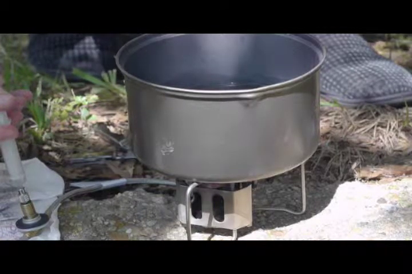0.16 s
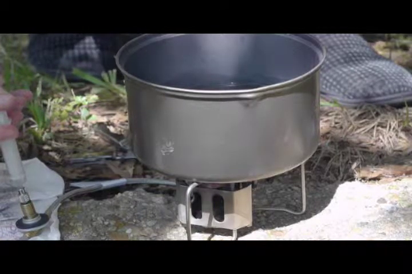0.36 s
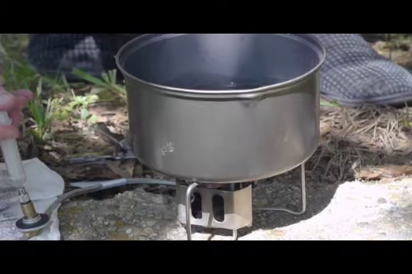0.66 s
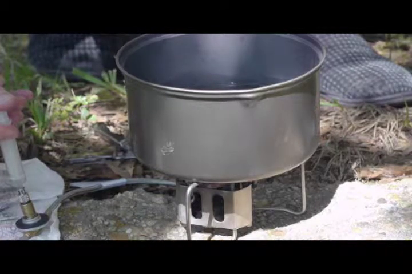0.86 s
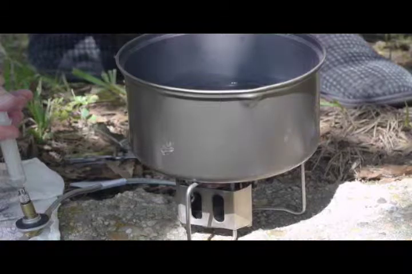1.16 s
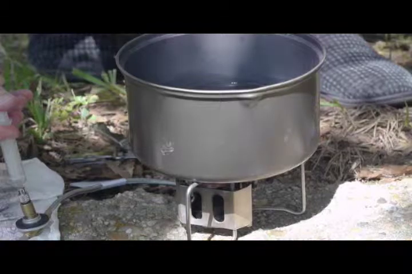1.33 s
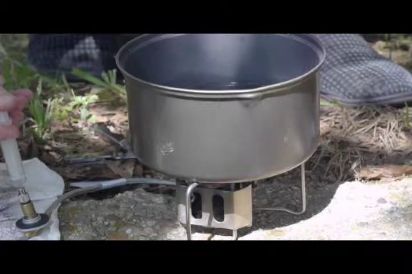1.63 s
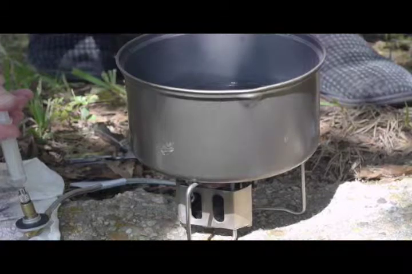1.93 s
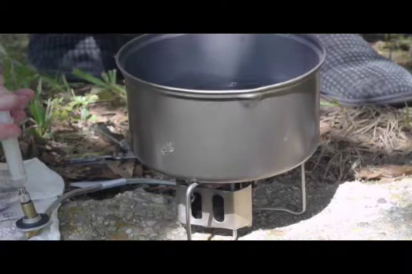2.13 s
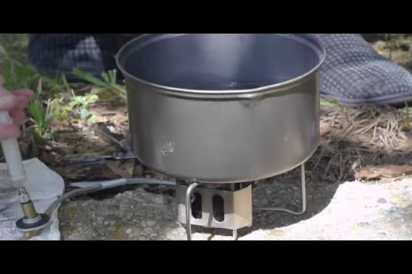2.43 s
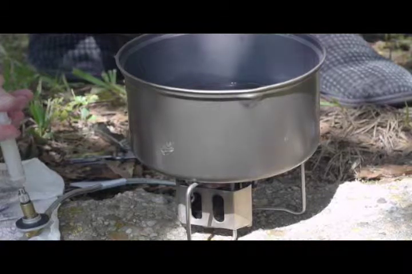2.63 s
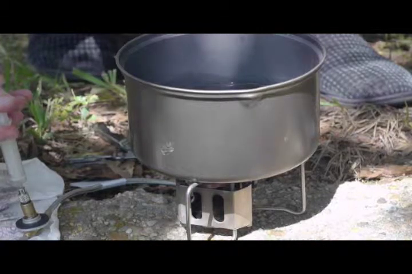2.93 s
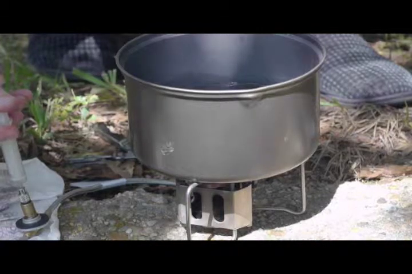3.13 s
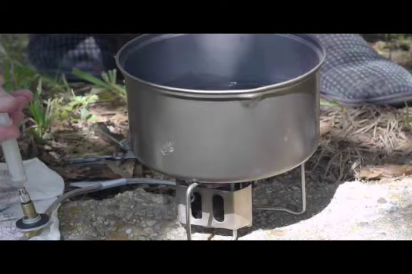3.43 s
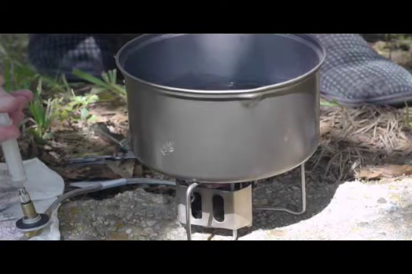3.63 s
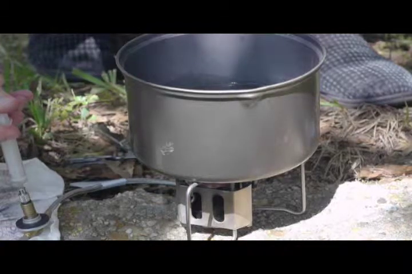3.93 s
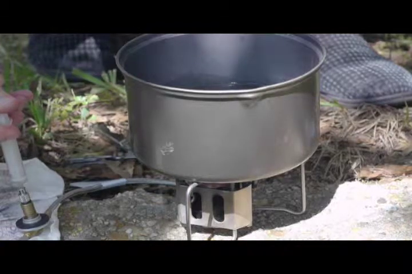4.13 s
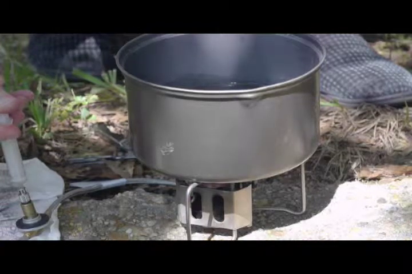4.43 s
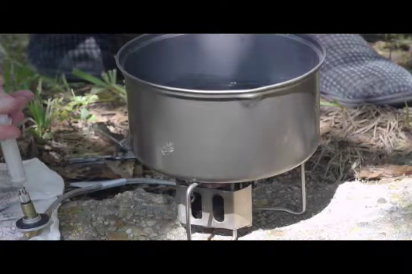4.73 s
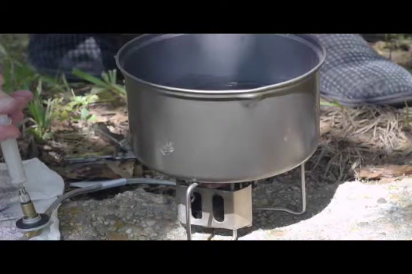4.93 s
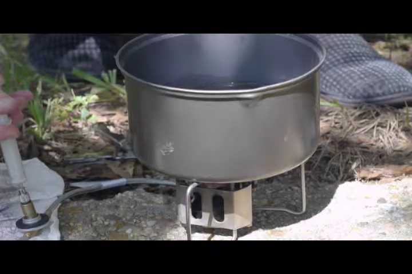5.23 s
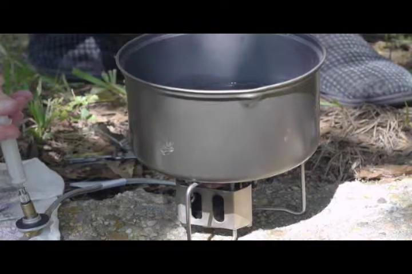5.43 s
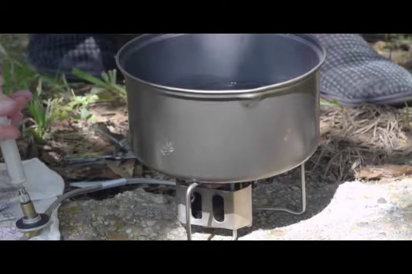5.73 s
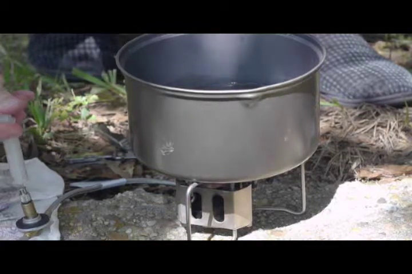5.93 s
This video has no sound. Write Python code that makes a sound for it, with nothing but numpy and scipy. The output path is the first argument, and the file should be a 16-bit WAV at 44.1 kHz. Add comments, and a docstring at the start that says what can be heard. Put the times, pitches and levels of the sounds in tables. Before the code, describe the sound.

Close, rushing gas flame of a camping burner cuts out suddenly as its fuel runs out, with faint traffic and thin bird whistles behind.

```python
"""A small camp stove roars close by under a metal pot, outdoors, until the fuel gives out and it dies.
The roar is turbulent gas, a dense rush with tiny pops, coloured by burner cup, wind shield and pot base.
Behind it far traffic rumbles and engines drone on drifting notes. A small bird whistles now and then,
thin and high, smeared by the trees, and a soft hiss swells once."""
import sys
import numpy as np
from scipy import signal
from scipy.fft import rfft, irfft
from scipy.io import wavfile
from scipy.ndimage import uniform_filter1d

SR = 44100
rng = np.random.default_rng(int(sys.argv[2]) if len(sys.argv) > 2 else 0)


def digitize_waveform(pressure):
    """Quantize a signal to 16-bit integers and store it at the path in sys.argv[1].

    Rows of a 2-D input are taken as channels; values are limited to [-1, 1].
    """
    field = np.atleast_2d(pressure).T
    bounded = np.clip(field, -1, 1)
    quanta = np.round(bounded * 32767).astype(np.int16)
    wavfile.write(sys.argv[1], SR, quanta)


N = 268260


def flame(flicker_db=0.22, flicker_hz=98, scatter_db=-14):
    """The stove's roar in stereo: burning gas, swaying in strength, rings the burner and pot."""
    burn = burning_gas()
    # ground and grass send back a little treble, different on each side
    treble = np.diff(rng.standard_normal((2, N + 2)), n=2)
    scatter = gain_of(scatter_db) * treble * (SR / (2 * np.pi * 4000)) ** 2  # level set at 4 kHz
    strength = gain_of(flame_strength() + flicker_db * wander(flicker_hz))
    bodies = stove_body()
    roar = [signal.oaconvolve(fuel_running_low(burn + back) * strength, body)[:N]
            for back, body in zip(scatter, bodies)]
    return np.array(roar) / np.linalg.norm(bodies[0])


def burning_gas(pops_per_s=1500, pop_share=0.2, spread_db=3.5, flash_s=.003, flash_hz=650):
    """Turbulent burning: a dense rush plus pockets of gas that all pop with the same polarity."""
    # the largest single flashes of gas, dull and short: t/s, level over the rush/dB
    flashes = [(.919, 10), (1.308, 8), (1.346, 13), (1.907, 11), (3.389, 10), (3.434, 7), (4.063, 10)]
    pop_sizes = gain_of(spread_db * np.minimum(rng.exponential(1, N), 4))
    pops = pop_sizes * (rng.random(N) < pops_per_s / SR)
    rush = rng.standard_normal(N)
    burn = np.sqrt(1 - pop_share) * rush - np.sqrt(pop_share) * unit_rms(pops - pops.mean())
    t = np.arange(round(flash_s * SR)) / SR
    puff = np.hanning(len(t)) * np.cos(2 * np.pi * flash_hz * (t - flash_s / 2))
    for start, db in flashes:
        burn[round(start * SR):][:len(puff)] -= gain_of(db) * puff / np.linalg.norm(puff)
    return burn


def flame_strength(burn_db=-23, flutter_db=0.14, flutter_hz=6, starve_s=5.524, fall_db_per_s=500):
    """Level curve in dB: the flame burns steadily, flutters, and dies when the fuel gives out."""
    # brief dips and surges of the roar: t/s, level change/dB, length/s
    swings = [(.09, -2, .06), (.875, -2.5, .036), (1.31, 2, .03), (1.355, 2.5, .036), (1.92, 1, .036),
              (2.225, -3, .05), (2.93, 1.3, .12), (3.72, -2, .036), (4.36, 2, .036), (5.418, 2, .036),
              (5.49, 3.2, .045)]
    t = np.arange(N) / SR
    swing_db = sum(db * np.exp(-(2 * (t - centre) / length) ** 2) for centre, db, length in swings)
    knee_s = .005
    starved_db = fall_db_per_s * knee_s * np.logaddexp(0, (t - starve_s) / knee_s)
    return burn_db + flutter_db * wander(flutter_hz) + swing_db - starved_db


def fuel_running_low(burn):
    """The starving jet brightens, surges once in its body, then loses its top first, its rumble last."""
    # band moves of the dying flame: low f/Hz, high f/Hz, [(t/s, level change/dB)]
    dying_bands = [(30, 380, [(5.52, 0), (5.56, 4)]), (450, 800, [(5.45, 0), (5.485, 2), (5.53, 2.5),
                   (5.55, 0)]), (820, 9000, [(5.46, 0), (5.505, -4)]), (1800, 9000, [(4.8, 0), (5.3, 1.2)])]
    for low_hz, high_hz, change in dying_bands:
        bandpass = signal.butter(3, (low_hz, high_hz), "band", fs=SR, output="sos")
        burn = burn + (gain_of(curves(change)[0]) - 1) * signal.sosfiltfilt(bandpass, burn)
    return burn


def stove_body(left_late_s=5.5e-6, n_fft=8192):
    """Left and right impulse responses of jet and metalwork; the stove sits a little nearer the right."""
    # broad colour of the burning jet: f/Hz, relative level/dB
    jet = [(30, -50.5), (80, -30), (155, -10.5), (200, -7.5), (250, -7.5), (432, -2), (714, -2),
           (2080, -19), (2390, -18.5), (2920, -26), (3720, -28), (4120, -35.5), (6800, -40), (7200, -52),
           (9590, -71.5)]
    # burner cup, wind shield and pot base lift and hollow the roar: f/Hz, width/Hz, gain/dB
    resonances = [(450, 175, 2.32), (714, 120, 1.2), (867, 73, -4.5), (1020, 250, 3), (1187, 130, -4),
                  (1410, 160, 1.5), (1505, 90, -2.5), (2070, 100, 1), (2128, 130, -6), (2360, 170, 5),
                  (2613, 190, 3), (2840, 150, -1), (3280, 180, -1.5), (3520, 250, 3), (3760, 130, 5),
                  (3940, 200, 2), (4330, 94, 5.5), (4570, 80, -4.5), (4670, 170, 4.5), (4760, 100, -3),
                  (5370, 150, -2), (5540, 150, 3)]
    # the pot shades the two sides unequally: f/Hz, width/Hz, left minus right/dB
    pot_shade = [(1120, 220, -.9), (1380, 200, -.5), (1800, 200, -1.3), (2200, 180, -3.5),
                 (2430, 250, -2.6), (2670, 150, 1.5), (2830, 120, -2), (3300, 400, 2), (3780, 150, 1.3),
                 (5250, 200, 1.5), (5620, 120, -1.5), (6350, 500, 3), (7150, 150, 3)]
    hz = np.fft.rfftfreq(n_fft, 1 / SR)
    colour_db = np.maximum(over_frequency(jet, hz), -70) + bell_eq(hz, resonances)
    bodies = []
    for side, late_s in ((.5, left_late_s), (-.5, 0)):
        ring = minimum_phase(colour_db + side * bell_eq(hz, pot_shade))
        delay = np.exp(-2j * np.pi * hz * (late_s + 8 / SR))
        bodies.append(irfft(rfft(ring, n_fft) * delay))
    return bodies


def traffic(patchy_db=1.5, n_fft=2048, hop=512):
    """Far traffic: a noise bed with drifting patches of colour, centred in the bass, wide on top."""
    # colour of the rumble: f/Hz, relative level/dB
    colour = [(15, -40), (30, -24), (60, -6), (100, -5), (135, -3.5), (160, -3), (180, -9), (235, -4),
              (300, -5), (450, -18), (700, -19), (900, -21), (1200, -19), (2000, -28), (3400, -37),
              (5000, -45), (8000, -57)]
    # ebb and swell of the traffic: t/s, level/dB
    swell = [(0, -36.5), (1.4, -40), (2.8, -40), (4.2, -41.5), (5.6, -40), (5.85, -39.5), (6.09, -42.5)]
    # likeness of left and right: f/Hz, correlation/0-1
    likeness = [(60, 1), (460, 0.96), (1200, 0.96), (2500, 0.3), (5000, 0.24)]
    hz = np.fft.rfftfreq(n_fft, 1 / SR)
    left_re, left_im, side_re, side_im, patches = rng.standard_normal((N // hop + 5, len(hz), 5)).T
    patches = uniform_filter1d(patches, size=10, axis=0)  # smooth across frequency
    patches = unit_rms(uniform_filter1d(patches, size=10, axis=1))  # and across time
    shared = over_frequency(likeness, hz)[:, None]
    left = left_re + 1j * left_im
    right = shared * left + np.sqrt(1 - shared ** 2) * (side_re + 1j * side_im)
    spectra = np.array([left, right]) * gain_of(over_frequency(colour, hz)[:, None] + patchy_db * patches)
    rumble = signal.istft(spectra, nperseg=n_fft, noverlap=n_fft - hop)[1][:, :N]
    return gain_of(curves(swell)[0]) * unit_rms(rumble)


def engine_drones(high_ratio=1.585, waver=.008, throb_db=1.5):
    """Far engines hum on two notes that drift together; a third, deeper one passes late."""
    # the paired engine notes: t/s, low note f/Hz, low note level/dB, high note level/dB
    paired_notes = [(0, 78.8, -59, -53), (.55, 79.7, -47.5, -53.5), (1.3, 76.45, -60.5, -47.5),
                    (2.3, 77.6, -51.5, -52), (3.05, 82.3, -45, -43), (3.65, 81.2, -47.5, -44.5),
                    (3.9, 82.1, -64, -49), (4.1, 84.3, -43, -37.5), (4.45, 83.9, -49, -44),
                    (4.6, 83.5, -51, -40.5), (4.85, 82.25, -47, -42), (5.2, 79.4, -52, -45.5),
                    (5.6, 81.2, -54, -44), (5.85, 81.4, -55, -42), (6.09, 81.7, -56, -48)]
    # the deep engine note: t/s, f/Hz, level/dB
    deep_note = [(4.55, 58, -70), (4.75, 59.5, -51), (5.35, 62.5, -50), (5.6, 63, -70)]
    low_hz, low_db, high_db = curves(paired_notes)
    notes = (low_hz, low_db), curves(deep_note), (high_ratio * low_hz, high_db)
    return sum(tone(hz * (1 + waver * wander(7.1)), db + throb_db * wander(5.8)) for hz, db in notes)


def bird(bend=2.3, warble=.016, rough_db=3, pan_db=1.5, echo_db=-2.5, reverb_s=.6):
    """Falling whistles with a fast warble, a little to the left, smeared by the trees."""
    # bird calls: start t/s, length/s, first f/Hz, last f/Hz, level at the crest/dB
    calls = [(-.05, .165, 6900, 6560, -51), (2.39, .21, 7240, 6400, -51), (4.59, .055, 7580, 7480, -54.5),
             (4.715, .165, 7400, 7080, -59.5)]
    song, t = np.zeros(N), np.arange(N) / SR
    for start, length, first_hz, last_hz, crest_db in calls:
        progress = np.clip((t - start) / length, 0, 1)
        hz = first_hz + (last_hz - first_hz) * progress ** bend  # the fall steepens
        db = crest_db + np.interp(progress, (0, .8, 1), (-9, 0, -3))  # swells, then fades
        gate = np.clip(np.minimum(progress, 1 - progress) * length / .03, 0, 1)  # 30 ms ramps
        song += gate * tone(hz * (1 + warble * wander(120)), db + rough_db * wander(60))
    tail_t = np.arange(SR // 4) / SR
    trees = rng.standard_normal((2, len(tail_t))) * gain_of(-60 * tail_t / reverb_s)
    echo = signal.oaconvolve(song[None], trees / np.linalg.norm(trees[0]), axes=1)[:, :N]
    direct = np.array([song * gain_of(pan_db), np.roll(song, 1) / gain_of(pan_db)])  # far side lags
    return direct + gain_of(echo_db) * echo


def swish(start_s=1.04, length_s=.17, band_hz=(3800, 5800), level_db=-51.5):
    """One soft hiss: a band of noise that rises fast and falls slowly."""
    progress = np.clip((np.arange(N) / SR - start_s) / length_s, 0, 1)
    bandpass = signal.butter(2, band_hz, "band", fs=SR, output="sos")
    hiss = unit_rms(signal.sosfilt(bandpass, rng.standard_normal(N)))
    return gain_of(level_db) * hiss * np.sin(np.pi * progress ** .55)


def gain_of(db):
    return 10 ** (np.asarray(db) / 20)


def unit_rms(x):
    return x / np.sqrt(np.mean(x ** 2) + 1e-20)


def over_frequency(points, hz):
    """Breakpoints joined along a log frequency axis."""
    point_hz, values = np.transpose(points)
    return np.interp(np.log(hz + 1), np.log(point_hz + 1), values)


def curves(rows):
    """One automation curve, sample by sample, for each column after the time."""
    times, *columns = np.transpose(rows)
    return [np.interp(np.arange(N) / SR, times, column) for column in columns]


def wander(hz):
    """Random drift of unit rms, with little motion faster than hz."""
    lowpass = signal.butter(2, hz, fs=SR, output="sos")
    return unit_rms(signal.sosfilt(lowpass, rng.standard_normal(N + SR))[SR:])


def bell_eq(hz, bells):
    """Sum of bell-shaped lifts and hollows in dB."""
    return sum(db / (1 + (2 * (hz - centre) / width) ** 2) for centre, width, db in bells)


def minimum_phase(db):
    """Impulse response that rings only after the hit, for an EQ curve from 0 Hz to SR / 2."""
    log_gain = np.log(gain_of(np.concatenate([db, db[-2:0:-1]])))
    spectrum = np.exp(np.conj(signal.hilbert(log_gain)))
    return np.fft.ifft(spectrum).real[:len(db)]


def tone(hz, db):
    """A sine that follows a pitch curve, at an rms level."""
    return np.sqrt(2) * gain_of(db) * np.sin(2 * np.pi * (np.cumsum(hz) / SR + rng.random()))


def scene():
    """The stove up front, the outdoors behind it."""
    return flame() + traffic() + engine_drones() + bird() + swish()


def record(dry, hiss_db=-59.5, low_cuts_hz=(52, 6), high_cut_hz=7480):
    """Microphone hiss, a bass roll-off that starts higher on the left, then a steep high cut."""
    noisy = dry + gain_of(hiss_db) * rng.standard_normal(dry.shape)
    thinned = np.array([signal.lfilter(*signal.butter(1, hz, "high", fs=SR), channel)
                        for hz, channel in zip(low_cuts_hz, noisy)])
    high_cut = signal.firwin(401, high_cut_hz, window=("kaiser", 9), fs=SR)
    return signal.oaconvolve(thinned, high_cut[None], "same")


dry = scene()
out = record(dry)
digitize_waveform(out)
```